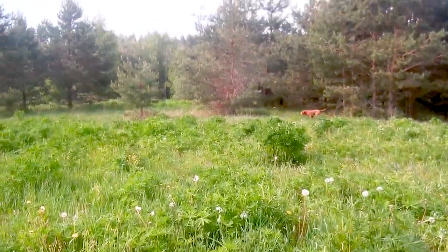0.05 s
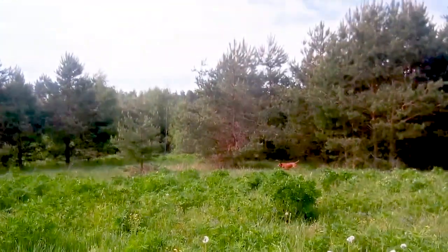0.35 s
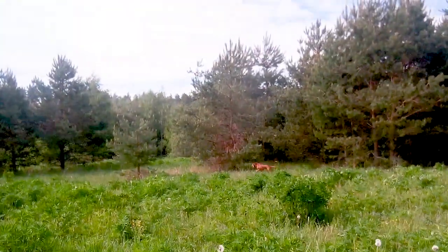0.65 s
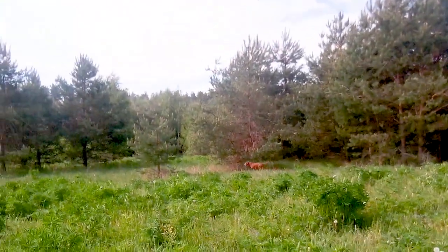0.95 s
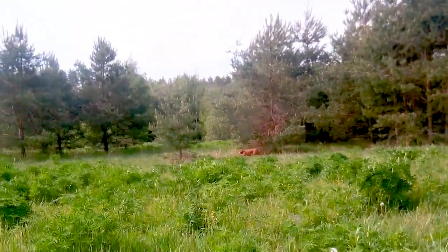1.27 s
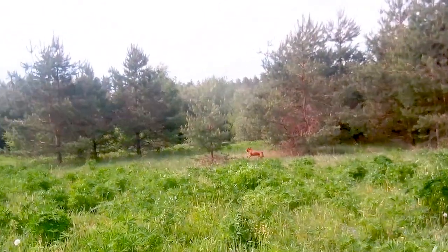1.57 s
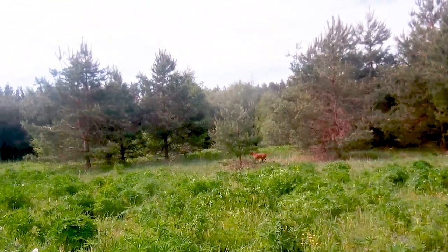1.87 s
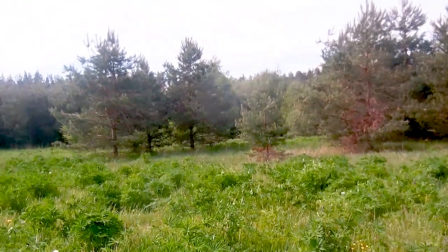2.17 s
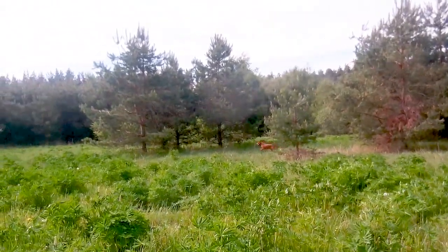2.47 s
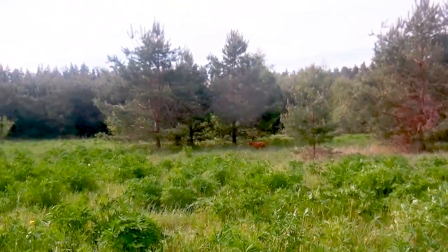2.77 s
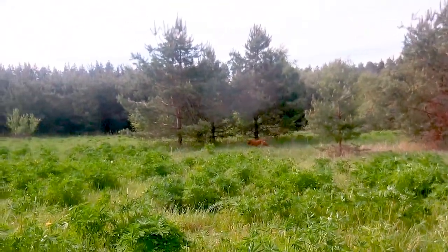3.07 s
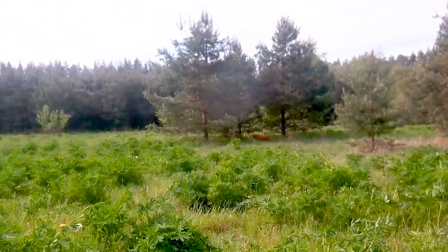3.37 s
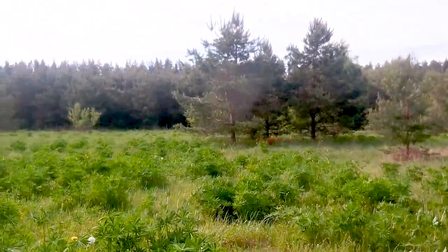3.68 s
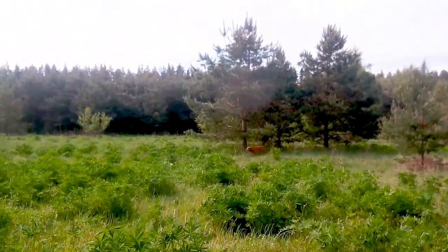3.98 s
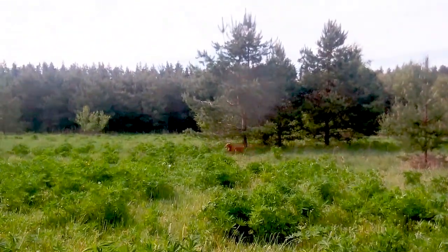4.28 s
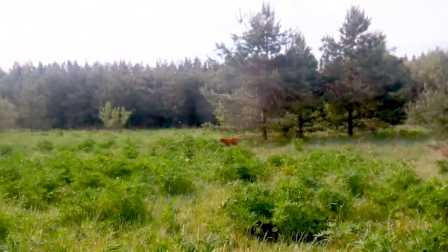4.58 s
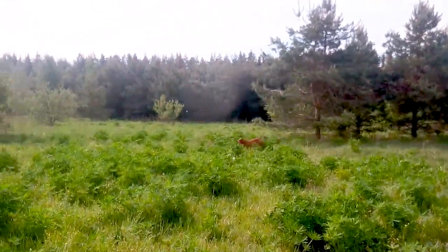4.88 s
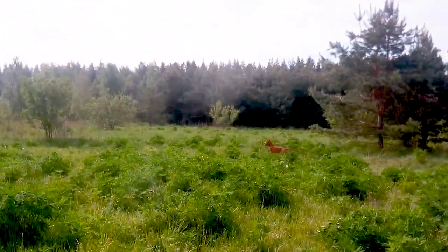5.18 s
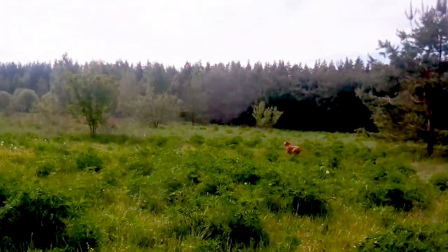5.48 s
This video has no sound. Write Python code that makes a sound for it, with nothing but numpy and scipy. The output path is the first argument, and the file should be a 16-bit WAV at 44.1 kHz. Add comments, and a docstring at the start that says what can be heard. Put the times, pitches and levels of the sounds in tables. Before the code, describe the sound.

From the start, a hand shifts on a small plastic camera right beside the microphone. Sharp, dry snaps come in a quick, irregular crackle, mixed with short creaks, hollow skin rubbing, scrapes, a low rumble and a few crisp fingernail ticks. The crackling is densest and loudest from about 0.5 to 1.1 seconds, flares again near 1.55, and ends with a few light clicks around 2 seconds.

The rest is a much quieter meadow: soft air in pines and grass over the camera's faint hiss and very thin, high whine. Low puffs of wind bump the microphone between 3 and 4 seconds, strongest near 3.4. From about 3 seconds to the end, distant birds give faint, short, high whistles and twitter with a slight echo. One small casing click stands out at about 5.1 seconds, with fainter ones near 4.6 and 5.4.

```python
"""A creaking camera in a quiet meadow

A hand shifts its grip on a small camera, right beside the microphone. Skin sticks and slips on
the plastic casing: each slip makes it ring with a short snap, and runs of slips make creaks.
The skin also rubs and scrapes, and a fingernail ticks. After about two seconds the hand settles,
leaving soft air, puffs of wind on the microphone, far birds and the camera's hiss and thin whine."""
import sys
import numpy as np
from scipy import signal
from scipy.fft import rfft, irfft, next_fast_len
from scipy.io import wavfile
from scipy.ndimage import map_coordinates

SR = 44100
rng = np.random.default_rng(int(sys.argv[2]) if len(sys.argv) > 2 else 0)


def generate_wav(signal):
    """Clip the signal to [-1, 1] and save it as 16-bit WAV at the path in sys.argv[1]."""
    frames = np.transpose(np.atleast_2d(signal))
    scaled = np.clip(frames, -1, 1) * 32767
    pcm = np.round(scaled).astype(np.int16)
    wavfile.write(sys.argv[1], SR, pcm)


N = 244314

# How hard the hand grips, as a loudness: time_s, level_db
GRIP_PRESSURE = [(0, -59.5), (.2, -54), (.32, -65), (.56, -57), (.9, -58.5), (1.15, -56), (1.3, -63),
                 (1.57, -54.5), (1.68, -57), (1.82, -68), (2.05, -65.5), (2.25, -84)]
# Tone of the bright hiss of both the grass and the camera: frequency_hz, level_db
HISS_SPECTRUM = [(2000, -8), (8000, -0.5), (12500, 2), (14400, 3), (15600, 2)]


def amp(db):
    """Turn decibels into a gain to multiply by."""
    return 10 ** (np.asarray(db) / 20)


def unit(x):
    """Scale a signal to an average (rms) level of 1."""
    return x / np.sqrt(np.mean(x ** 2) + 1e-20)


def curve(points):
    """Join (time_s, value) points with straight lines, one value per sample."""
    time_s, values = np.transpose(points)
    return np.interp(np.arange(N) / SR, time_s, values)


def wobble(rate):
    """A smooth random curve through `rate` random points a second."""
    points = rng.standard_normal(int(N * rate / SR) + 4)
    return map_coordinates(points, [np.arange(N) * rate / SR])


def filtered(x, response):
    """Scale each frequency in x by the gain response(hz)."""
    size = next_fast_len(N + SR // 2)
    return irfft(rfft(x, size) * response(np.fft.rfftfreq(size, 1 / SR)), size)[:N]


def noise(spectrum):
    """Noise of level 1 whose tone follows (frequency_hz, level_db) points."""
    points_hz, db = np.transpose(spectrum)
    white = rng.standard_normal(N)
    return unit(filtered(white, lambda hz: amp(np.interp(np.log(hz + 1), np.log(points_hz), db))))


def swells(rows):
    """Smooth rises and falls of gain from (middle_s, half_width_s, level_db) rows."""
    t = np.arange(N) / SR
    return sum(amp(db) * np.exp(-.5 * ((t - middle) / width) ** 2) for middle, width, db in rows)


def bursts(start_s, level_db, fade_s):
    """A gain that jumps up at each start, then falls 60 dB in fade_s."""
    kicks = np.bincount(np.round(start_s * SR).astype(int), amp(level_db), N)
    fade = amp(-60 * np.arange(SR // 4) / SR / fade_s)
    return signal.fftconvolve(kicks, fade)[:N]


def electronics(level_db=-79.5, whine_db=-6):
    """The camera's amplifier hisses and adds two faint, very high tones."""
    # Tones of the whine: pitch_hz, level_db
    tones = [(12780, -7), (12878, -6)]
    t = np.arange(N) / SR
    whine = sum(amp(db) * np.sin(2 * np.pi * (hz * t + rng.random())) for hz, db in tones)
    return amp(level_db) * (noise(HISS_SPECTRUM) + amp(whine_db) * whine)


def meadow(buffet_db=-1, air_db=6.5, grass_db=-8, grass_growth=1.66, lumps_db=2, drift_db=0.5):
    """Air moves through pines and hisses in the grass; the hand, then the wind, thumps the microphone."""
    # Strength of the breeze: time_s, level_db
    breeze_points = [(2.2, -68), (2.49, -69.5), (2.92, -68), (3.19, -65), (3.53, -64.5), (4.2, -68.5),
                     (4.48, -67), (4.63, -68), (5.54, -67.5)]
    # Tone of the low buffeting and thumps: frequency_hz, level_db
    buffet_spectrum = [(12, -43), (20, 3.5), (59, 3), (107, -9), (250, -20), (320, -42), (550, -120)]
    # Tone of air in the pines: frequency_hz, level_db
    air_spectrum = [(35, -22), (60, -11.5), (108, -9.5), (260, -11.5), (380, -12), (468, -14), (542, -15.5),
                    (825, -17.5), (2260, -31), (3430, -33), (5920, -40), (9000, -43), (11700, -99),
                    (19800, -120)]
    # Low thumps, first from the hand, later from wind: middle_s, half_width_s, level_db
    thumps = [(1.59, .04, -56), (2.03, .06, -59), (2.67, 0.02, -59), (3.03, 0.021, -54),
              (3.2, 0.066, -53.5), (3.43, 0.044, -48), (3.8, .15, -57.5), (4.28, .04, -63)]
    breeze_db = curve(breeze_points)
    peak_db = breeze_db.max()
    buffet = unit(amp(lumps_db * wobble(30)) * noise(buffet_spectrum))
    air = amp(breeze_db + air_db + drift_db * wobble(8)) * noise(air_spectrum)
    grass = amp(peak_db + grass_db + grass_growth * (breeze_db - peak_db)) * noise(HISS_SPECTRUM)
    return (amp(breeze_db + buffet_db) + swells(thumps)) * buffet + air + grass


def twitter(centre_hz=3750, sweep=0.082, level_db=-85, flutter_db=4):
    """Birds deep in the wood blend into one fluttering tone that slides quickly up and down."""
    rise_db = curve([(2.6, -3), (3.4, 0), (4.6, 1.5)])
    pitch_hz = centre_hz * np.exp(sweep * wobble(110))
    tone = np.sin(2 * np.pi * np.cumsum(pitch_hz) / SR)
    return amp(level_db + rise_db) * unit(amp(flutter_db * wobble(30)) * tone)


def birds(note_s=0.043, waver=0.022, direct_db=-5, echo_db=-2, echo_fade_s=0.39):
    """A far bird's thin whistles echo off the wood; of the twitter, only the echo arrives."""
    # The bird's notes: start_s, start_hz, end_hz, level_db
    notes = [(2.951, 3600, 3220, -72), (3.695, 4900, 4600, -70), (3.82, 3460, 3220, -66),
             (4.47, 3500, 3960, -75), (4.941, 4900, 4320, -71), (5.015, 5650, 4820, -71),
             (5.16, 4330, 4650, -72), (5.216, 4160, 3600, -73), (5.44, 4300, 4750, -69)]
    t, song = np.arange(N) / SR, np.zeros(N)
    bend = 1 + waver * wobble(97)
    for start_s, start_hz, end_hz, db in notes:
        progress = np.clip((t - start_s) / note_s, 0, 1)
        pitch_hz = (start_hz + (end_hz - start_hz) * progress) * bend
        song += amp(db) * np.sin(np.pi * progress) * np.sin(2 * np.pi * np.cumsum(pitch_hz) / SR)
    tail = rng.standard_normal(SR // 2) * amp(-60 * t[:SR // 2] / echo_fade_s)
    echo = signal.fftconvolve(song + twitter(), tail / np.linalg.norm(tail))[:N]
    return amp(direct_db) * song + amp(echo_db) * echo


def hand(roughness_db=4.8):
    """The grip rumbles through the camera; a fingertip that glides without sticking only swishes."""
    # Tone of the rumble: frequency_hz, level_db
    rumble_spectrum = [(30, -2), (100, -14), (170, 1.5), (300, -7), (500, -5), (900, -7), (3000, -70)]
    # A fingertip glides past the microphone: middle_s, half_width_s, level_db
    glides = [(.005, 0.0078, -50.5), (0.194, 0.036, -50.5), (1.65, 0.031, -53)]
    # Tone of its swish: frequency_hz, level_db
    swish_spectrum = [(800, -3.5), (1600, -3), (2200, 6), (2900, -2), (3700, 0), (4150, -9), (4650, 3.5),
                      (6500, -18), (7600, -18), (8500, -4), (9500, -19.5), (15000, -13.5)]
    rumble = amp(curve(GRIP_PRESSURE)) * noise(rumble_spectrum)
    roughness = unit(amp(roughness_db * wobble(300)))
    return rumble + swells(glides) * roughness * noise(swish_spectrum)


def skin_drag(slips, scrape_db=-3, skid_db=-23, skid_fade_s=0.085, rise_s=0.014, fall_s=0.024):
    """Skin drags in fine grains: a hollow rub in strokes and after slips, a scrape under pressure."""
    # Strokes of skin over the casing: start_s, end_s, level_db
    strokes = [(0.099, 0.213, -51), (0.557, 0.69, -57.5), (0.823, 1.065, -62), (1.342, 1.374, -52.5),
               (1.504, 1.623, -53)]
    # Tone of the hollow rub: frequency_hz, level_db
    rub_spectrum = [(450, -26), (600, -2.5), (790, 26), (1050, 3), (1300, 14.5), (1900, -76)]
    # Tone of the dry scrape: frequency_hz, level_db
    scrape_spectrum = [(900, 5.5), (1600, 3.5), (2150, 4), (2800, -4), (3700, -4), (4150, -12),
                       (4650, -0.5), (6000, -18), (8400, -13), (10000, -54), (15000, -48)]
    t = np.arange(N) / SR
    stroking = sum(amp(db) * np.exp(np.minimum(t - start, 0) / rise_s - np.maximum(t - end, 0) / fall_s)
                   for start, end, db in strokes)
    start_s, knock_db, _, _ = slips.T
    skidding = bursts(start_s, knock_db + skid_db, skid_fade_s)
    grains = unit(amp(3 * wobble(500)))
    rub = (stroking + skidding) * noise(rub_spectrum)
    scrape = amp(curve(GRIP_PRESSURE) + scrape_db) * noise(scrape_spectrum)
    return grains * (rub + scrape)


def fingernail(level_db=-2, ring_fade_s=0.0092, crack_fade_s=0.0064):
    """A nail catches the edge of the casing: thin, crisp ticks, most of them on top of a snap."""
    # Each catch of the nail: start_s, ring_db, crack_db
    catches = [(.0442, -31.5, -62), (0.209, -45, -38.5), (2.0017, -33.5, -65), (5.3994, -66, -50)]
    # Tone of the thin ring: frequency_hz, level_db
    ring_spectrum = [(1000, -23), (3300, -12.5), (5000, 9), (6500, -24), (9000, -32.5)]
    # Tone of the sharp crack: frequency_hz, level_db
    crack_spectrum = [(1000, -3), (9000, -3), (15000, 0)]
    start_s, ring_db, crack_db = np.transpose(catches)
    ring = bursts(start_s, ring_db + level_db, ring_fade_s) * noise(ring_spectrum)
    crack = bursts(start_s, crack_db + level_db, crack_fade_s) * noise(crack_spectrum)
    return ring + crack


def stick_slip(jitter_s=0.00041, scatter_db=0.5, tick_growth=0.86):
    """List all slips as (start_s, knock_db, clack_db, tick_db); abrupt ones sound brighter."""
    # Single snaps, where brightness is clack minus knock: start_s, knock_db, brightness_db
    snaps = [(.0521, -41.5, 9.5), (.1158, -33.5, -7), (.1259, -30, 3), (.134, -44.5, 15), (.185, -36, 10.5),
             (.1887, -27.5, 2.5), (.2024, -38, 6), (.2097, -25.5, 3.5), (.2477, -35, -9), (.2868, -27, 1),
             (.333, -30.5, 5), (.3606, -30.5, 0.5), (.4047, -27, -2.5), (.4189, -29.5, -2),
             (.4445, -26.5, -6), (.4505, -29.5, -1.5), (.5132, -25, 0), (.5217, -29.5, -7),
             (.5591, -23.5, -4), (.5733, -23, -2), (.5826, -24, -3.5), (.6046, -32.5, -7),
             (.6196, -24.5, -10), (.6404, -26, 3.5), (.6563, -24.5, -12), (.6998, -22.5, -11),
             (.7288, -26, 7.5), (.7898, -23.5, -4.5), (.8087, -23, -10), (.8151, -26.5, 7.5),
             (.8293, -26.5, 7.5), (.8439, -23, 6), (.861, -23, -13), (.8911, -18.5, 5.5), (.925, -22, -0.5),
             (.9473, -21.5, 7.5), (.968, -24, -4), (.9762, -27, -3), (.9793, -26.5, 5.5), (1.0305, -27, 14),
             (1.0785, -27, 12.5), (1.2175, -32.5, -5), (1.2339, -31.5, -6), (1.3404, -28.5, -4.5),
             (1.3888, -31, -7), (1.439, -33, -6.5), (1.5062, -30.5, -1), (1.5529, -36, 19.5),
             (1.5565, -24.5, 7.5), (1.5886, -26.5, 1), (1.7329, -41, 3.5), (1.9353, -37.5, 4),
             (2.0028, -39.5, 5), (2.0299, -39.5, 2), (4.5805, -60, 9), (5.0783, -42.5, 3),
             (5.4003, -53.5, 8)]
    # Creaks, runs of soft slips at a steady pace: start_s, end_s, gap_s, knock_db, brightness_db
    runs = [(0.1454, .181, .0103, -35.5, -2), (0.6664, 0.688, 0.006, -27.5, -16),
            (.7083, .719, 0.0078, -28.5, -23), (.9982, 1.073, 0.017, -29, -13),
            (1.112, 1.2, .0363, -31.5, -12), (1.4716, 1.495, .0171, -32.5, -10)]
    rows = list(snaps)
    for start_s, end_s, gap_s, knock_db, brightness_db in runs:
        chance = rng.standard_normal(size=(32, 2))
        for time_s, (late, louder) in zip(np.arange(start_s, end_s, gap_s), chance):
            rows.append((time_s + jitter_s * late, knock_db + scatter_db * louder, brightness_db))
    start_s, knock_db, brightness_db = np.transpose(rows)
    clack_db = knock_db + brightness_db
    tick_db = knock_db + tick_growth * brightness_db
    return np.column_stack([start_s, knock_db, clack_db, tick_db])


def soften_snaps(x, low_hz=160, high_hz=6000):
    """Trim deep bass and high treble so the snaps sound softer."""
    bass_cut = signal.butter(2, low_hz, "high", fs=SR, output="sos")
    treble_cut = signal.butter(7, high_hz, fs=SR, output="sos")
    return signal.sosfilt(np.vstack([bass_cut, treble_cut]), x)


def grit(slips, level_db=-11, fade_s=0.009):
    """The sliding surfaces crackle briefly in every slip, most in the sharp ones."""
    # Tone of the crackle: frequency_hz, level_db
    crackle_spectrum = [(400, -25), (1050, -34), (1750, 3.5), (2400, 21), (4000, -17), (5300, -20),
                        (6500, -12), (8400, 31.5), (9500, -59)]
    start_s, _, clack_db, tick_db = slips.T
    return bursts(start_s, (clack_db + tick_db) / 2 + level_db, fade_s) * noise(crackle_spectrum)


def creak(slips, clack_from_hz=1100, tick_from_hz=4200, trims_db=(0, 1, -9), scatter_db=1.85,
          rise_s=0.00006, step_s=0.00021, hard_from_db=-26, extra_ring=0.65):
    """Each slip kicks the casing, which rings with a low knock, a middle clack and a high tick."""
    # The casing's natural tones: pitch_hz, level_db, fade_s (time to fall 60 dB)
    casing_tones = [(213, -20, 0.0085), (330, -18.5, 0.019), (553, -18, 0.0089), (728, 3.5, 0.012),
                    (828, 4, 0.0067), (816, -14, 0.031), (1273, -5, 0.029), (1577, 2, 0.012),
                    (2136, 6.5, 0.0055), (2353, 1.5, 0.014), (2854, -1.5, 0.0093), (3230, 1.5, 0.0059),
                    (3573, 1.5, 0.0098), (4620, 10, 0.013), (4820, 7.5, 0.0045), (5800, 10.5, 0.0021),
                    (6500, -2, 0.005), (7650, -25, .005)]
    out, t = np.zeros(N + SR), np.arange(SR // 12) / SR
    pitch_hz, level_db, fade_s = np.transpose(casing_tones)
    group = np.searchsorted([clack_from_hz, tick_from_hz], pitch_hz)  # 0 knock, 1 clack, 2 tick
    # Neighbouring low tones push the wall opposite ways, so the knock swells just after the snap.
    sign = np.where(group > 0, 1, (-1) ** np.arange(len(pitch_hz)))
    for start_s, knock_db, clack_db, tick_db in slips:
        # Where the finger presses changes each tone a little.
        louder, higher = rng.standard_normal((2, len(pitch_hz)))
        gain = sign * amp(level_db + scatter_db * louder)
        shifted_hz = pitch_hz * (1 + .009 * higher)
        # A hard slip lifts the skin off the wall, so the knock rings longer.
        hardness = np.clip((clack_db - hard_from_db) / 10, 0, 1)
        ring_s = fade_s * (1 + extra_ring * hardness * (group == 0))
        envelope = amp(-60 * t / ring_s[:, None]) * (1 - np.exp(-t / rise_s))
        tones = gain[:, None] * envelope * np.exp(2j * np.pi * shifted_hz[:, None] * t)
        # The slip lets go in steps: knock, then clack, then tick.
        for step, db in enumerate([knock_db, clack_db, tick_db]):
            ring = tones[group == step].sum(axis=0)
            first = round((start_s + step * step_s) * SR)
            out[first:first + len(t)] += amp(db + trims_db[step]) * ring.imag / np.abs(ring).max()
    return out[:N]


def scene():
    """Close handling sounds over the quiet meadow, in one channel."""
    slips = stick_slip()
    casing = soften_snaps(creak(slips) + grit(slips))
    handling = casing + fingernail() + skin_drag(slips) + hand()
    return (handling + meadow() + birds() + electronics())[None]


def record(dry):
    """The camera keeps nothing above its highest frequency."""
    top_hz = 15650
    return np.array([filtered(channel, lambda hz: hz < top_hz) for channel in dry])


dry = scene()
out = record(dry)
generate_wav(out)
```